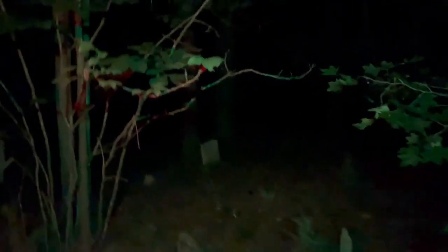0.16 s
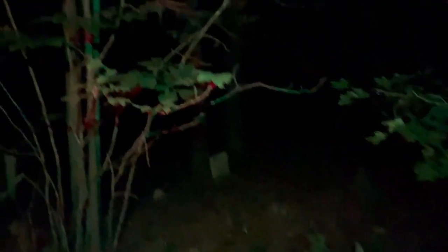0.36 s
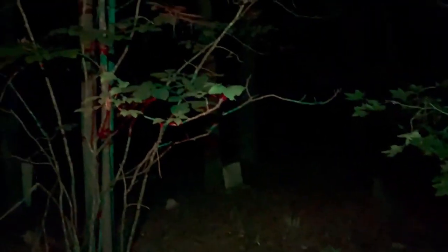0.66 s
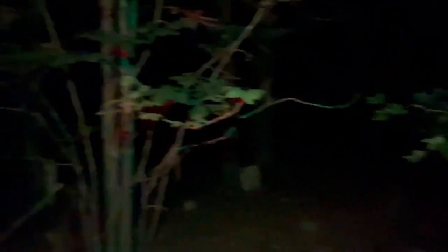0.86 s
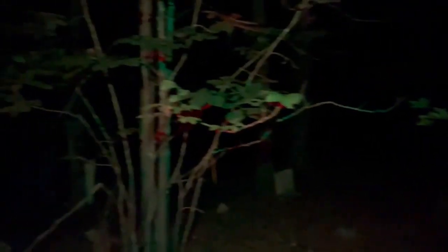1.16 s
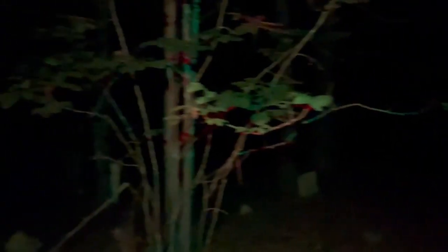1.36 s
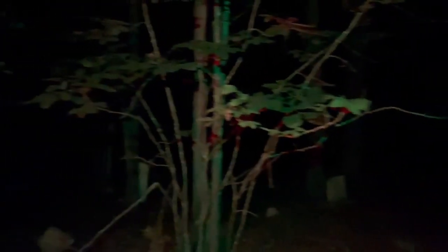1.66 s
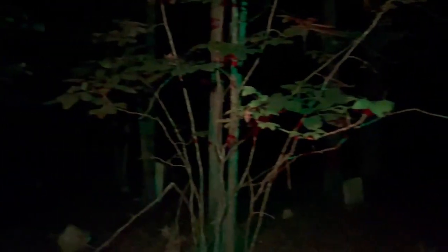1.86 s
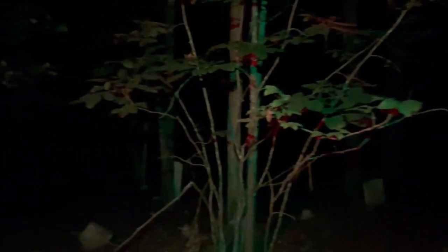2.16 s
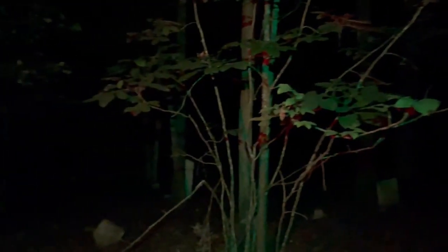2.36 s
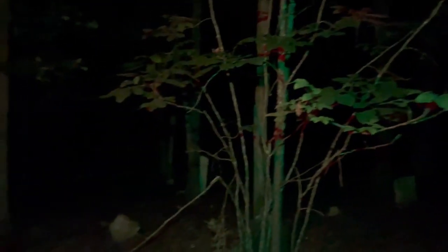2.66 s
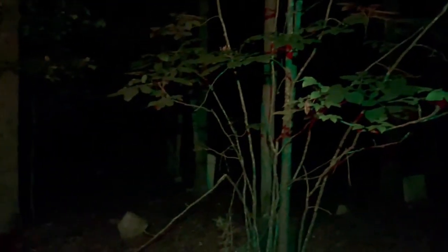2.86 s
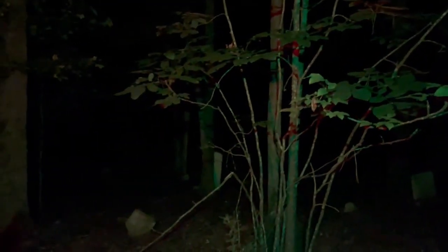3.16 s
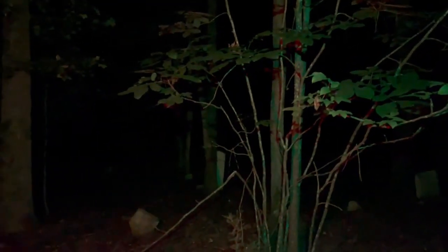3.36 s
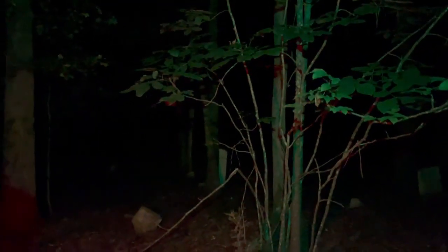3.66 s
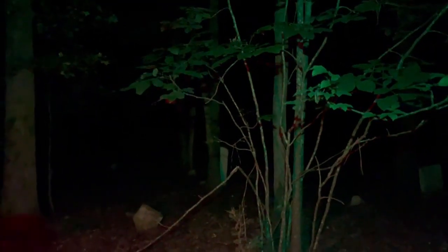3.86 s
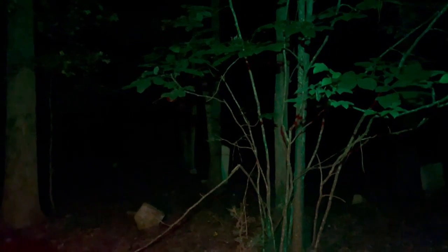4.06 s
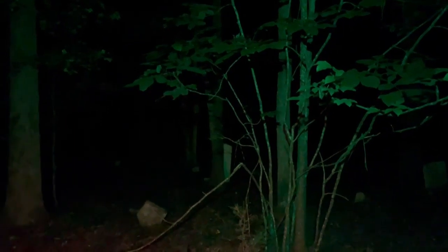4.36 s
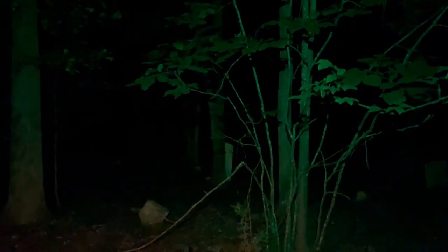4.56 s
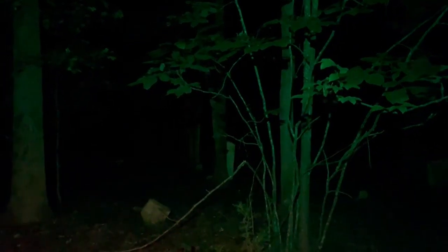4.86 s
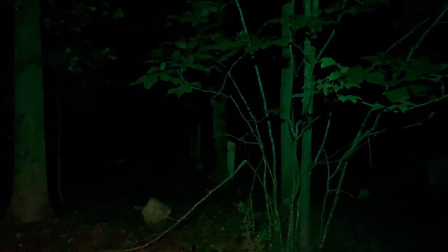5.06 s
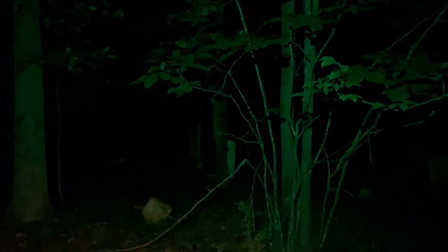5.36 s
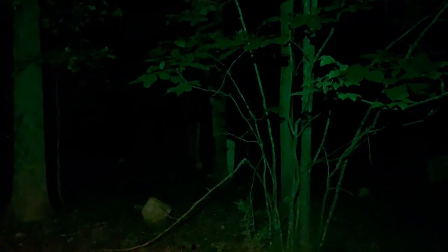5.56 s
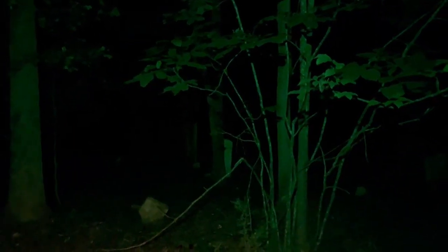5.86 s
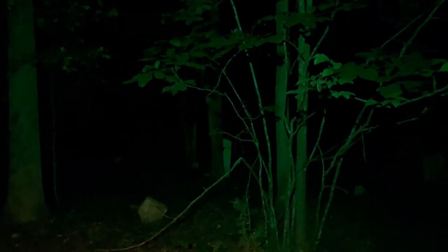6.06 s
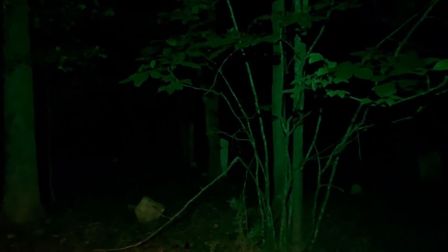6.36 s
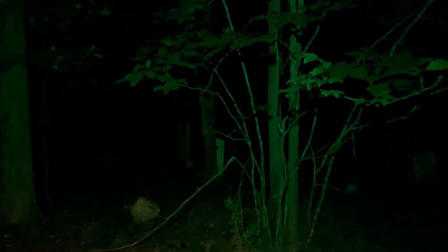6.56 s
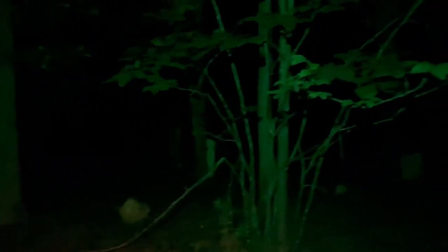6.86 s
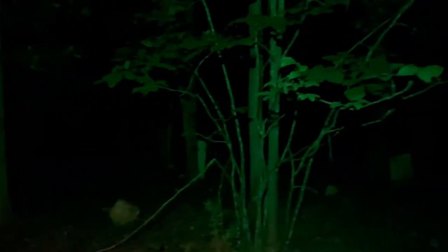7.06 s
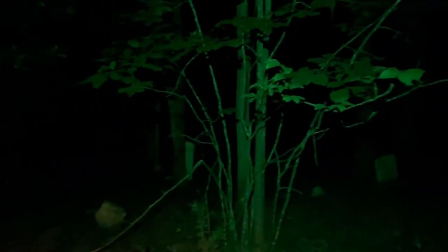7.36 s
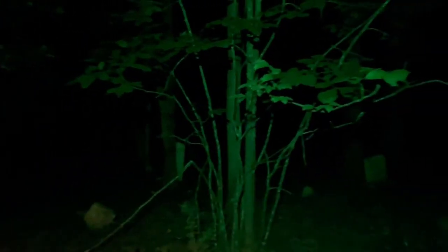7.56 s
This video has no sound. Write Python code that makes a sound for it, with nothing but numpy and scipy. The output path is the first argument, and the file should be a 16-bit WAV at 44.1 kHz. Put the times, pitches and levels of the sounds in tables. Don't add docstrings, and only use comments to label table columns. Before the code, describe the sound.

Dense night chorus of crickets and katydids in a wood, low traffic rumble behind, with a brief burst of leaf scuffing and sharp twig snaps midway.

```python
import sys
import numpy as np
from scipy import signal
from scipy.fft import rfft, irfft
from scipy.io import wavfile
from scipy.ndimage import uniform_filter1d

SR = 44100
rng = np.random.default_rng(int(sys.argv[2]) if len(sys.argv) > 2 else 0)


def boost_factor(decibels):
    exponent = np.asarray(decibels, float) / 20
    return 10 ** exponent


def wav_record(signal):
    frames = np.transpose(np.atleast_2d(signal))
    bounded = np.clip(frames, -1, 1)
    quanta = np.round(bounded * 32767).astype(np.int16)
    wavfile.write(sys.argv[1], SR, quanta)


N = 339570
T = np.arange(N) / SR


def rms_one(x):
    return x / np.sqrt(np.mean(x ** 2) + 1e-20)


def in_time(rows):
    time_s, *columns = np.transpose(rows)
    return [np.interp(T, time_s, column) for column in columns]


def at_hz(points):
    hz, value = np.transpose(points)
    return np.interp(np.log(np.fft.rfftfreq(N, 1 / SR) + 1), np.log(hz), value)


def fade(start_s, end_s, edge_s):
    return np.clip(np.minimum(T - start_s, end_s - T) / edge_s + .5, 0, 1)


def drift(rate_hz):
    knots_s = np.arange(0, T[-1] + 2 / rate_hz, 1 / rate_hz)
    return np.interp(T, knots_s, rng.standard_normal(len(knots_s)))


def pan(left_right_db):
    half_db = left_right_db / 2 + 0 * T
    return boost_factor(np.array([half_db, -half_db]))


def resonate(x, hz, width_hz):
    r = np.exp(-np.pi * width_hz / SR)
    feedback = [1, -2 * r * np.cos(2 * np.pi * hz / SR), r * r]
    return signal.lfilter([(1 - r * r) / 2, 0, (r * r - 1) / 2], feedback, x)


def ring_wing(clicks, hz, width_hz):
    for _ in range(3):
        clicks = resonate(clicks, hz, width_hz)
    return clicks


def coloured(white, spectrum, least_alike=0.):
    # freq_hz, likeness_0_to_1
    likeness = [(60, 1), (140, 0.71), (330, 0.66), (770, 0.05), (1500, 0.044), (4000, 0.13), (13000, 0.84)]
    mid, side = rfft(white) * boost_factor(at_hz(spectrum))
    alike = np.clip(at_hz(likeness), least_alike, 1)
    sides = np.sqrt(1 + alike) * mid + np.sqrt(1 - alike) * side * [[1], [-1]]
    return rms_one(irfft(sides, N))


def singer(hz, width_hz, per_s, jitter, size):
    strokes = rng.standard_normal((500, 2))
    at = np.cumsum((1 + jitter * strokes[:, 0]) * SR / per_s).astype(int)
    clicks = np.full(size, 1e-18)
    clicks[at[at < size]] = boost_factor(1.0 * strokes[at < size, 1])
    return rms_one(ring_wing(clicks, hz, width_hz))


def crowd(hz, spread_hz, width_hz, per_s, pan_db, count, size=6, lag_spread=0.85):
    out = np.zeros((2, N))
    places = np.linspace(-1.6, 1.6, count) if count > 1 else [0.]
    for place in places:
        clicks = np.full((2, N + 64), 1e-18)
        for tempo, lag, start in rng.standard_normal((size, 3)):
            strokes = rng.standard_normal((1200, 2))
            period = SR / per_s * (1 + .05 * tempo)
            beats = np.cumsum(1 + .03 * strokes[:, 0]) * period
            at = (beats - period * (np.abs(start) % 1)).astype(int) + 32
            inside = (at >= 32) & (at < N)
            at, strength = at[inside], boost_factor(2.0 * strokes[inside, 1])
            lag_samples = int(np.clip(round(1 + lag_spread * lag), -30, 30))
            clicks[0, at] += strength
            clicks[1, at + lag_samples] += strength
        rung = ring_wing(clicks[:, 32:N + 32], hz + spread_hz * place, width_hz)
        out += rung * np.exp(-place ** 2 / 4)
    return rms_one(out) * pan(pan_db)


def in_wood(x, wet, t60_s):
    tail = rng.standard_normal((2, SR // 4)) * boost_factor(-60 * T[:SR // 4] / t60_s)
    tail /= np.sqrt(np.sum(tail ** 2, axis=1, keepdims=True))
    scatter = signal.fftconvolve(x[None], tail, axes=1)[:, :len(x)]
    direct = np.array([x, np.roll(x, 1)])
    return np.sqrt(1 - wet) * direct + np.sqrt(wet) * scatter


def ground_crickets():
    # time_s, throb_depth_db
    in_step = [(0, 7), (0.5, 3.5), (1.7, -1), (2.3, 2), (3.2, -1.5), (4.1, 5), (5.0, 2.5), (6.1, 3),
               (7.7, 5.5)]
    # centre_hz, spread_hz, wing_ring_width_hz, pulses_per_s, level_db, left_right_db
    steady_crowds = [
        (6326, 274, 586, 62, -48, 4),
        (4862, 278, 200, 48, -65, 5.5),
        (11480, 360, 640, 110, -73, -3),
        (5773, 123, 220, 48, -54.5, 0.5),
        (9230, 600, 1000, 76, -80, 3.5),
    ]
    throb_per_s, crest_s, mean_db = 2.76, 4.275, -52.5
    song_top_hz = 7230

    depth_db, = in_time(in_step)
    throb_db = depth_db * np.cos(2 * np.pi * throb_per_s * (T - crest_s))
    throb_gain = boost_factor(mean_db + throb_db + 1.5 * drift(8.2))
    out = throb_gain * crowd(5775, 43.6, 154, 55, 7.5, count=3, size=5)
    steep = signal.butter(12, song_top_hz, fs=SR, output="sos")
    for hz, spread_hz, width_hz, per_s, level_db, pan_db in steady_crowds:
        sung = boost_factor(level_db) * crowd(hz, spread_hz, width_hz, per_s, pan_db, count=8)
        out += signal.sosfilt(steep, sung) if hz < song_top_hz else sung
    return out


def phrases():
    # start_s, hold_s, level_db
    tree_phrases = [
        (-0.5, 0.88, -56),
        (2.004, 1.78, -58),
        (5.286, 1.4, -59.5),
        (7.69, 1.0, -56.5),
    ]
    rise_db_per_s, drop_db, drop_s, fade_db_per_s = 36, 2.5, 0.12, 7
    out = np.zeros(N)
    for start_s, hold_s, level_db in tree_phrases:
        before_s = np.clip(start_s - T, 0, None)
        after_s = np.clip(T - start_s - hold_s, 0, None)
        loss_db = drop_db * np.minimum(after_s / drop_s, 1) + fade_db_per_s * after_s
        out = np.maximum(out, boost_factor(level_db - rise_db_per_s * before_s - loss_db))
    return out


def tree_crickets():
    # time_s, level_db
    high_crowd = [(0, -62), (0.5, -67.5), (1.4, -69.5), (2.5, -69), (3.3, -67.5), (4.3, -63), (5.0, -68),
                  (5.3, -62), (5.5, -68.5), (6.2, -68.5), (6.9, -65), (7.42, -63), (7.55, -75)]
    near = in_wood(singer(2590, 150, 58.7, .006, size=N), wet=.35, t60_s=.25)
    near = near + 0.5 * crowd(2603, 36, 210, 57, 0., count=2, size=3)
    turning_pan_db = 3 + 0.87 * T
    near = phrases() * boost_factor(0.4 * drift(5)) * near * pan(turning_pan_db)

    low_db = -63.5 - 0.5 * T + 1.0 * drift(6.2)
    low = boost_factor(low_db) * crowd(2018, 33, 137, 58, 6.6, count=3, lag_spread=11.6)
    high_db, = in_time(high_crowd)
    high = boost_factor(high_db + 3.0) * crowd(2201, 34, 150, 58, 1.9, count=3, lag_spread=13.0)
    return near + low + high


def field_crickets():
    # start_s, length_s, pitch_hz, level_db, left_right_db
    trills = [(0, 0.31, 4970, -63, 2), (.35, 0.32, 4900, -59.5, 1), (0.513, 0.48, 5040, -68, 5),
              (0.851, 0.34, 5080, -61.5, 0), (1.14, 0.32, 5140, -56.5, 3), (1.046, 0.42, 4800, -61, 6),
              (1.954, 0.3, 4900, -60.5, 6), (2.195, 0.28, 4680, -65, 6), (2.452, 0.94, 4850, -67, 3),
              (3.097, 0.33, 5100, -54, 9), (3.746, 0.13, 5000, -58, 8), (4.104, 0.34, 4960, -61.5, 8),
              (4.895, 0.26, 4860, -60.5, 8), (4.949, 0.46, 5000, -68, 4), (5.448, 0.42, 4970, -60, 8),
              (5.817, 0.29, 5150, -54.5, 4), (6.101, 0.31, 4710, -61.5, 4), (6.203, 0.86, 4880, -68, 4),
              (6.418, 0.22, 4400, -68, 1), (6.898, 0.26, 4940, -58.5, 9), (7.2, 0.32, 4850, -61.5, 4),
              (7.499, .2, 5080, -62.5, 7)]
    out = np.zeros((2, N + SR))
    for start_s, length_s, hz, level_db, pan_db in trills:
        size, at = int((length_s + 0.35) * SR), int(start_s * SR)
        swell = np.clip(np.minimum(T[:size], length_s + 0.05 - T[:size]) / 0.09, 0, 1)
        pair = singer(hz, 200, 47, .07, size=size) + .7 * singer(hz - 70, 200, 51, .07, size=size)
        trill = in_wood(pair * swell, wet=.85, t60_s=.35)
        sides = boost_factor(np.array([[pan_db / 2], [-pan_db / 2]]))
        out[:, at:at + size] += boost_factor(level_db) * trill * sides
    return out[:, :N]


def katydids():
    # crest_s, level_db
    waves = [(0.0, -62.5), (0.3, -64.5), (0.62, -63), (1.0, -62), (1.232, -61.5), (1.55, -62.5),
             (1.82, -62), (2.13, -63.5), (2.44, -62.5), (2.66, -65), (3.03, -60.5), (3.4, -56.5),
             (3.8, -61.5), (4.15, -65.5), (4.5, -62), (4.85, -63.5), (5.1, -65.5), (5.52, -64),
             (5.8, -63.5), (6.05, -65), (6.45, -63), (6.95, -60.5), (7.15, -62), (7.4, -64), (7.75, -68)]
    # time_s, level_db
    high_group = [(0.0, -72), (0.51, -77), (1.09, -68), (1.31, -73), (1.72, -73), (1.82, -75), (2.87, -72),
                  (3.5, -59), (4.03, -79.5), (4.63, -73), (5.3, -85), (5.49, -80), (5.62, -75),
                  (6.84, -75.5), (7.12, -69), (7.7, -82)]
    wave_half_width_s = 0.1
    power = np.zeros(N)
    for crest_s, level_db in waves:
        power += boost_factor(2 * level_db) * np.exp(-((T - crest_s) / wave_half_width_s) ** 2 / 2)
    low = np.sqrt(power) * crowd(3365, 346, 420, 110, 3.4, count=7, lag_spread=2.6)
    high_db = np.minimum(in_time(high_group)[0], -68)
    high_gain = boost_factor(1.5 * (high_db + 72) - 71)
    return low + high_gain * crowd(4190, 150, 350, 110, 3.2, count=3, lag_spread=2.6)


def traffic_and_air():
    # freq_hz, density_db_per_hz
    air_colour = [(22, -38), (45, -1.5), (65, 3), (120, -6.5), (200, -12.5), (400, -20.5), (700, -35.5),
                  (1200, -43.5), (1800, -31.5), (4000, -42), (7400, -73), (8500, -74), (10500, -37),
                  (13000, -49.5)]
    # time_s, pitch_hz, level_db
    hums = [
        [(0.0, 70, -57.5), (1.86, 69.3, -56.5), (2.8, 65.5, -60.5), (3.7, 70.0, -51), (3.9, 69.3, -57),
         (4.3, 69.3, -48.5), (5.8, 69.6, -48.5), (6.1, 70, -53), (6.6, 71, -55), (6.88, 71.8, -43.5),
         (7.1, 69, -52), (7.7, 68.5, -50)],
        [(0.03, 81.4, -52.5), (1.81, 81.05, -54), (2.19, 82.3, -57), (2.51, 81.6, -55.5), (2.9, 78.24, -54.5)],
        [(3.5, 113, -53), (3.93, 113.2, -61), (4.26, 109.5, -48.5), (4.51, 109.6, -56), (5.64, 111.2, -58),
         (5.87, 113.8, -52), (6.1, 114.5, -60), (6.6, 114.5, -49.5), (7.7, 115.6, -54.5)],
        [(0.3, 128.3, -54.5), (0.75, 131, -72), (1.81, 130.0, -58), (2.4, 126, -63.5)],
    ]
    air_db = -48.5
    out = boost_factor(air_db + 0.28 * drift(2.84)) * coloured(rng.standard_normal((2, N)), air_colour)
    for rows in hums:
        hz, level_db = in_time(rows)
        phase = 2 * np.pi * np.cumsum(hz + 0.76 * drift(6)) / SR
        gain = np.sqrt(2) * boost_factor(level_db + 1.0 + 2.3 * drift(8))
        out += gain * fade(rows[0][0] - .2, rows[-1][0] + 0.29, 0.3) * np.sin(phase)
    return out * boost_factor(np.array([[.9], [-.9]]))


def snaps():
    # time_s, crisp_peak_db, thin_peak_db, middle_peak_db, dull_peak_db
    snap_events = [(0.967, -42, -59, -54, -49.5), (1.277, -55, -70, -47, -71),
                   (3.122, -60, -67.5, -50, -74), (3.139, -43, -60, -61, -69), (3.306, -26, -47, -38, -37),
                   (3.451, -24, -20, -28, -42), (3.49, -26, -40, -26, -48), (3.505, -22, -17.5, -20, -35),
                   (3.525, -38, -40, -56, -59), (3.595, -54, -54, -48, -43), (3.639, -38, -32, -50, -46),
                   (3.6671, -29, -42, -22, -38.5), (3.6991, -51, -38, -29.5, -55),
                   (3.803, -42, -62, -62, -56), (3.879, -53, -61, -61, -56), (3.928, -40, -57, -60, -65),
                   (3.97, -66, -70, -64, -54), (4.163, -51, -70, -63, -61), (4.35, -61, -39, -62, -56),
                   (4.385, -48, -63, -64, -66), (4.497, -47, -69, -58, -67), (4.681, -61, -71, -56, -72),
                   (4.699, -46, -66, -63, -68), (4.798, -47, -66, -62, -72)]
    # centre_hz, width_hz, t60_s
    snap_bands = [
        (8500, 3000, .007),
        (11800, 3200, .006),
        (4300, 4500, .008),
        (1700, 750, .014),
    ]
    out, rows = np.zeros((2, N)), np.array(snap_events)
    at = np.round(rows[:, 0] * SR).astype(int)
    noise = rng.standard_normal((len(rows), 1200))
    noise[:, 0] = 4.2
    sides = boost_factor(np.array([[2.5], [-2.5]]))
    for k, (hz, width_hz, t60_s) in enumerate(snap_bands):
        decaying = noise * boost_factor(-60 * T[:1200] / t60_s)
        bursts = resonate(resonate(decaying, hz, width_hz), hz, width_hz)
        bursts *= boost_factor(rows[:, [k + 1]] + 2.0) / np.abs(bursts).max(axis=1, keepdims=True)
        for i, burst in zip(at, bursts):
            out[:, i:i + 1200] += burst * sides
    return signal.sosfilt(signal.butter(3, 13500, fs=SR, output="sos"), out)


def bumps():
    # time_s, peak_db, pitch_hz
    knocks = [
        (1.89, -47.5, 187),
        (3.507, -40, 157),
        (4.796, -50, 157),
        (5.574, -44, 236),
        (6.742, -43.5, 200),
    ]
    out = np.zeros(N)
    for start_s, peak_db, hz in knocks:
        after_s = np.clip(T - start_s, 0, None)
        envelope = (1 - np.exp(-after_s / 0.00092)) * boost_factor(-60 * after_s / 0.039)
        out += boost_factor(peak_db + 9.5) * np.sin(2 * np.pi * hz * after_s) * envelope
    return out


def scuffs():
    # start_s, hold_s, level_db, thin_above_crisp_db
    scuff_events = [(3.154, 0.088, -60.5, -5), (3.276, 0.018, -40, -5), (3.294, 0.08, -38, -2),
                    (3.381, 0.05, -34.5, -6.5), (3.454, 0.069, -44.5, -3.5), (3.562, 0.13, -47, -8),
                    (3.724, 0.31, -64, -3), (4.17, 0.092, -70, -12), (4.34, 0.15, -64.5, -6),
                    (4.697, 0.017, -67, -7), (4.79, 0.02, -73, -14), (5.443, 0.11, -82.5, 22.5),
                    (5.58, 0.15, -79, 7)]
    # freq_hz, density_db_per_hz
    body_colour = [(120, 0), (300, 0), (1000, -2.5), (2500, -4.5), (4800, -2.5), (7000, -4.5), (7800, -36)]
    crisp_colour = [(6500, -13), (7500, 2), (9000, 8), (10000, 7), (10800, -55)]
    thin_colour = [(9600, -28), (10400, 7), (11200, 9), (12200, -5), (12900, -30), (14000, -52)]
    rise_db_per_s, fall_db_per_s = 406, 300
    body_db, body_follows = -40, 0.91

    grains = boost_factor(6.1 * np.minimum(rng.exponential(1, N), 5)) * (rng.random(N) < 1500 / SR)
    crackle = 1 + 1.6 * uniform_filter1d(grains, size=16)
    white = rng.standard_normal((2, N)) * crackle * boost_factor(1.6 * drift(120))
    body = coloured(white, body_colour, least_alike=0.17)
    crisp = coloured(white, crisp_colour, least_alike=0.17)
    thin = coloured(white, thin_colour, least_alike=0.17)
    gains = np.zeros((3, N))
    for start_s, hold_s, level_db, thin_db in scuff_events:
        before_s = np.clip(start_s - T, 0, None)
        after_s = np.clip(T - start_s - hold_s, 0, None)
        away_db = rise_db_per_s * before_s + fall_db_per_s * after_s
        levels_db = [[level_db - 3.0],
                     [level_db + thin_db + 4.5],
                     [body_db + body_follows * (level_db + 35)]]
        gains = np.maximum(gains, boost_factor(levels_db - away_db))
    return gains[0] * crisp + gains[1] * thin + gains[2] * body * pan(6.6)


def scene():
    insects = ground_crickets() + tree_crickets() + field_crickets() + katydids()
    return insects + traffic_and_air() + snaps() + bumps() + scuffs()


def low_pass(x):
    return signal.sosfilt(signal.butter(12, 16500, fs=SR, output="sos"), x)


def record(dry):
    shared_above_hz, turn_zero_hz, turn_period_hz = 7450, 8550, 3500
    left, right = rfft(dry)
    hz = np.fft.rfftfreq(N, 1 / SR)
    turned = left * np.exp(2j * np.pi * (hz - turn_zero_hz) / turn_period_hz)
    right = np.where(hz > shared_above_hz, turned, right)
    mix = irfft(np.array([left, right]), N)
    return low_pass(mix)


dry = scene()
out = record(dry)
wav_record(out)
```